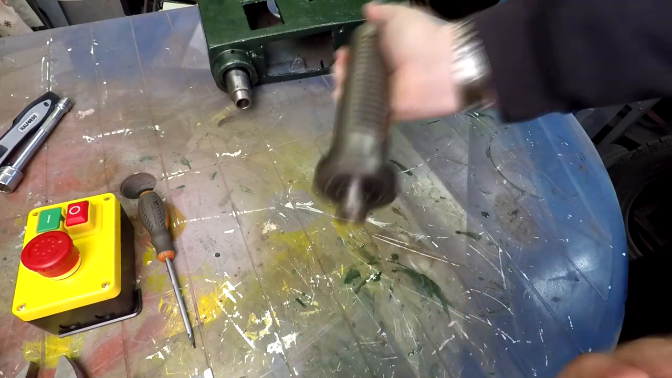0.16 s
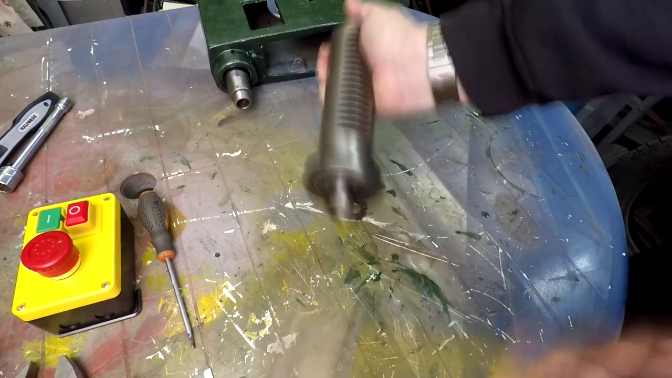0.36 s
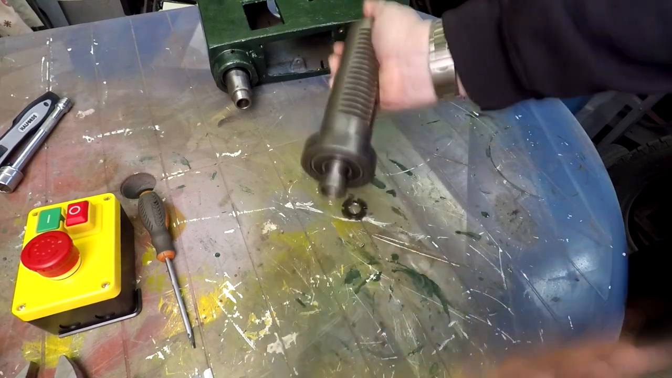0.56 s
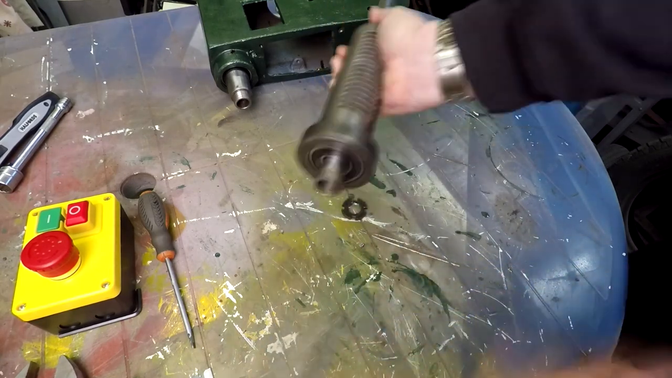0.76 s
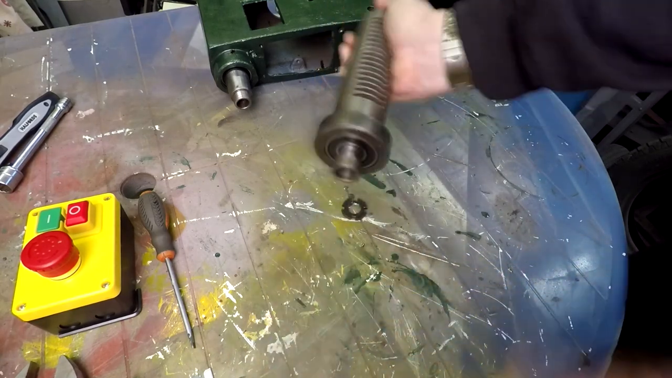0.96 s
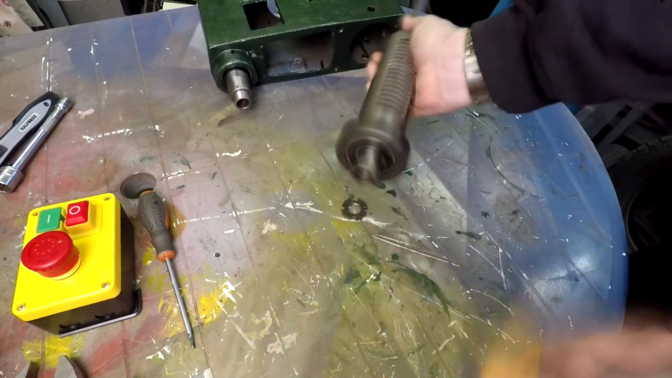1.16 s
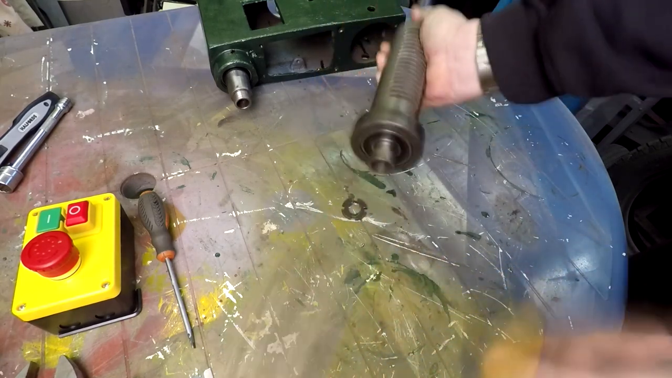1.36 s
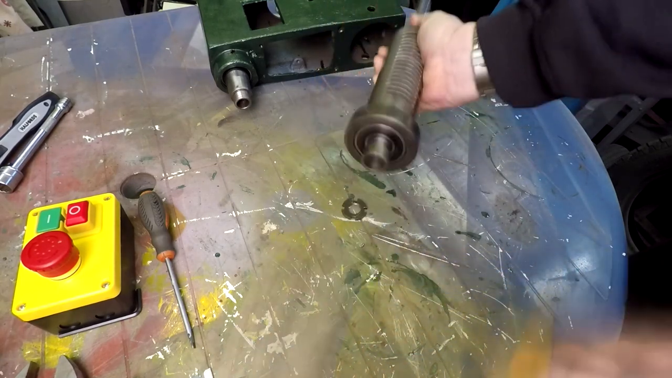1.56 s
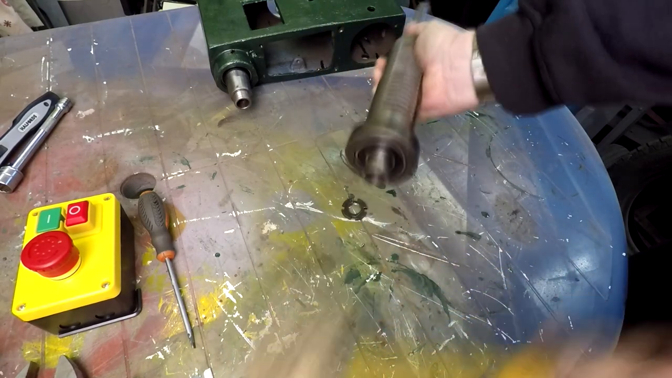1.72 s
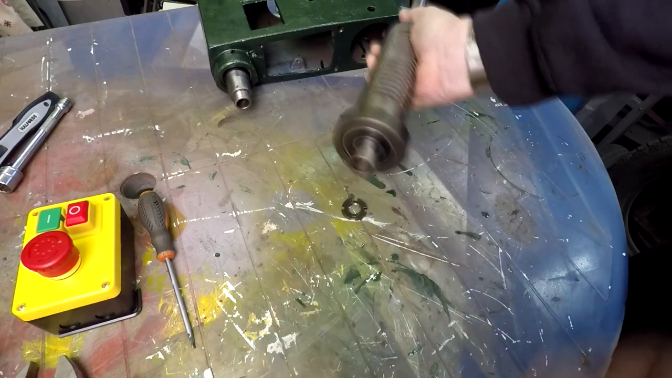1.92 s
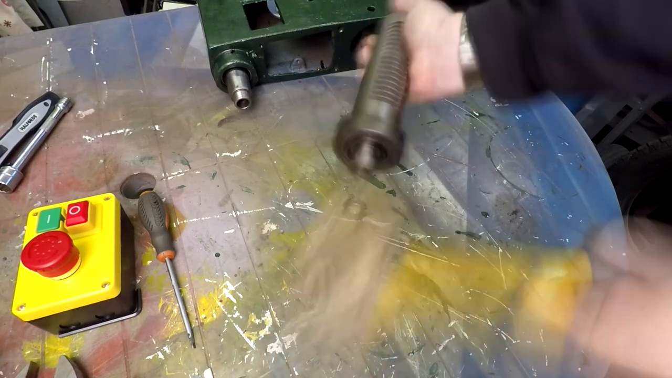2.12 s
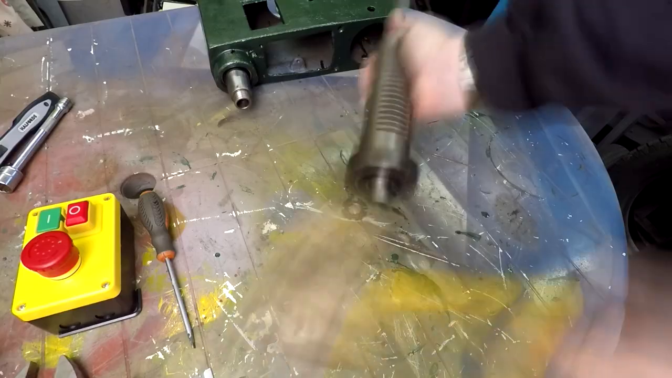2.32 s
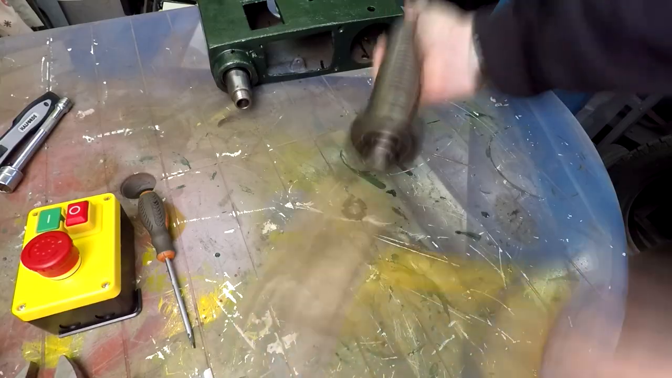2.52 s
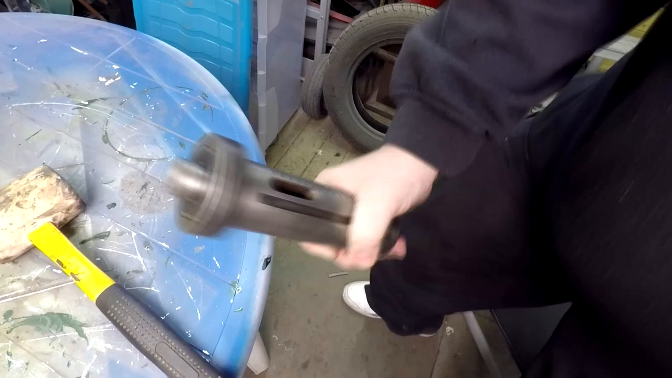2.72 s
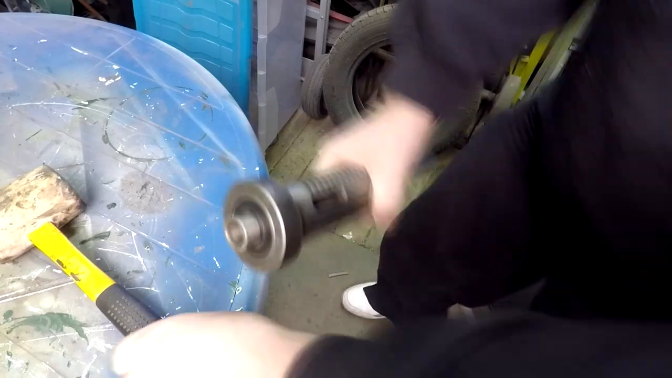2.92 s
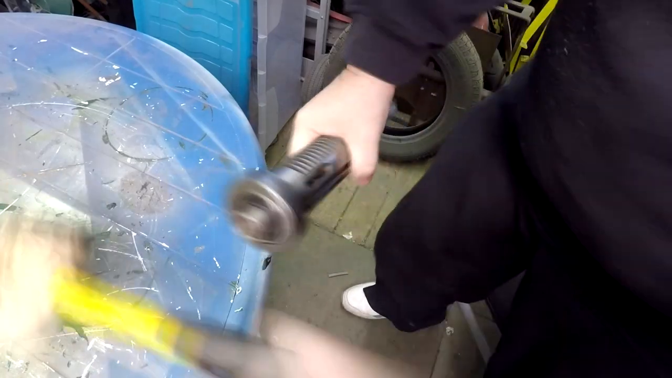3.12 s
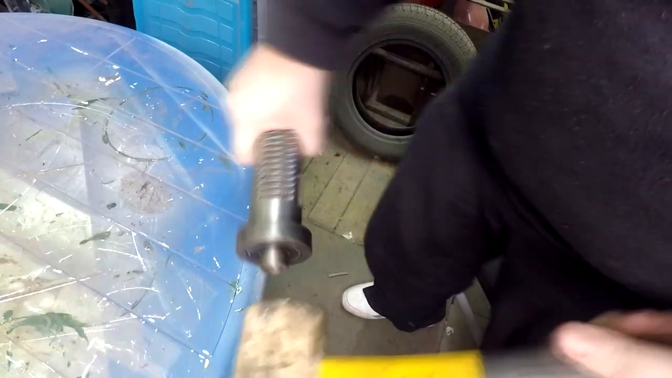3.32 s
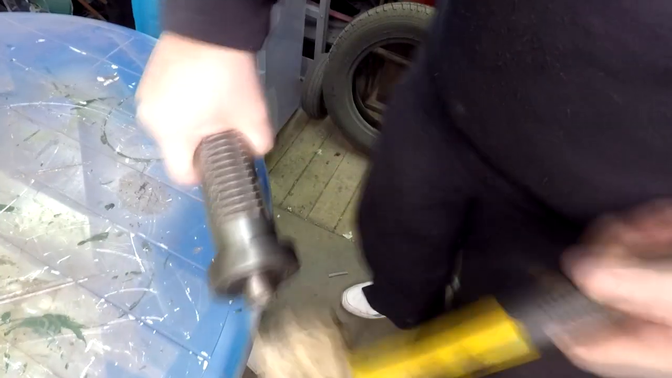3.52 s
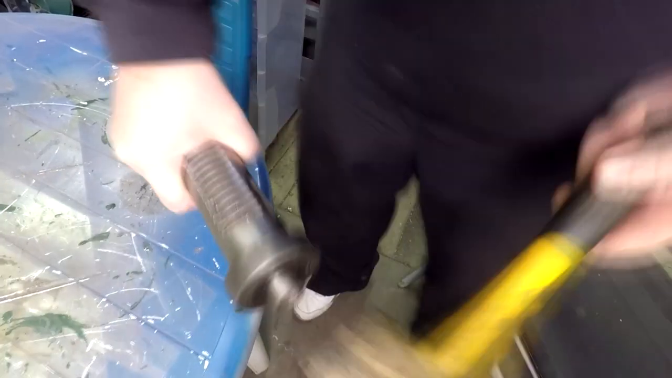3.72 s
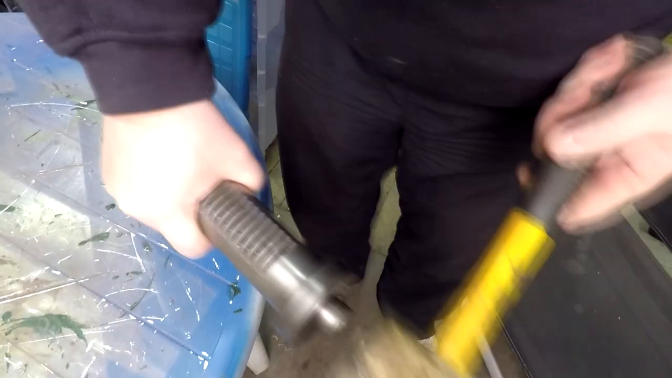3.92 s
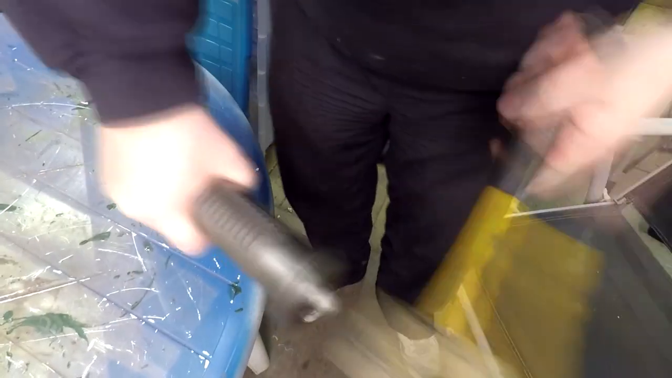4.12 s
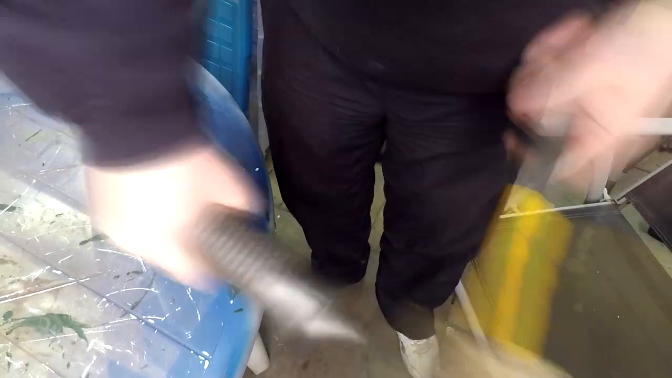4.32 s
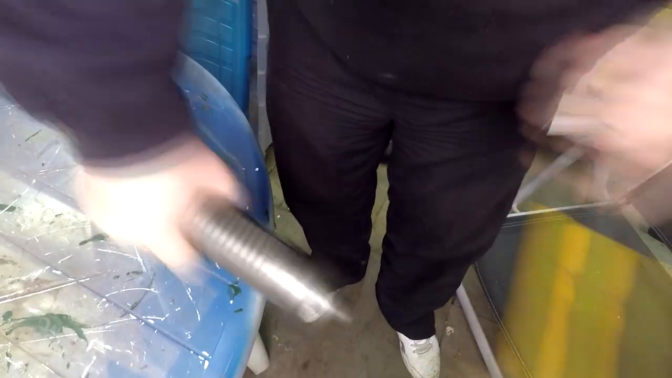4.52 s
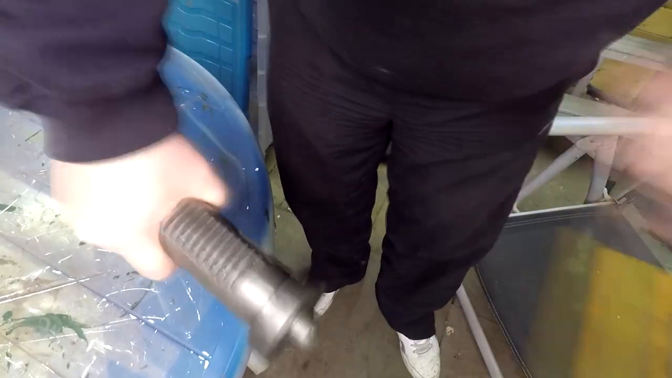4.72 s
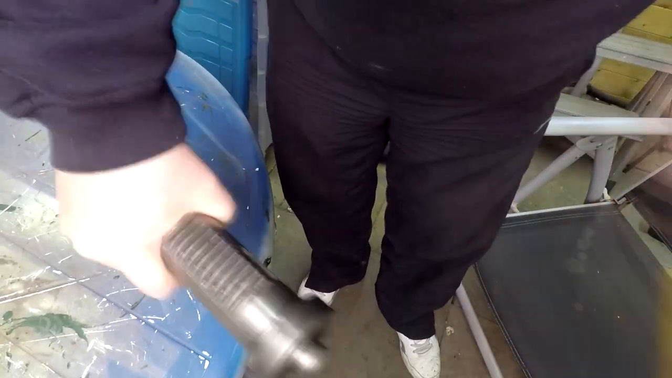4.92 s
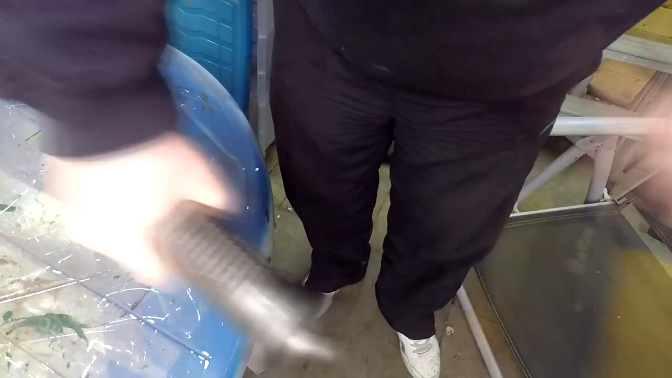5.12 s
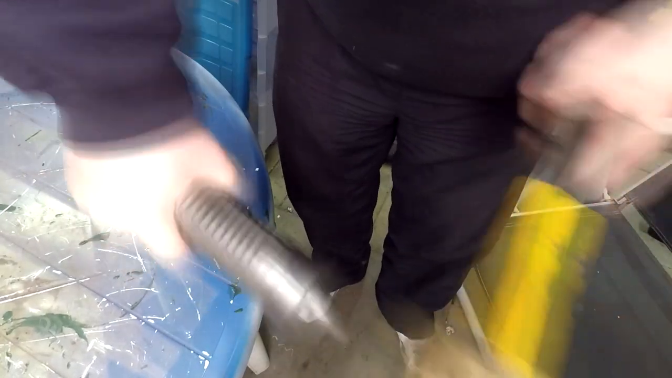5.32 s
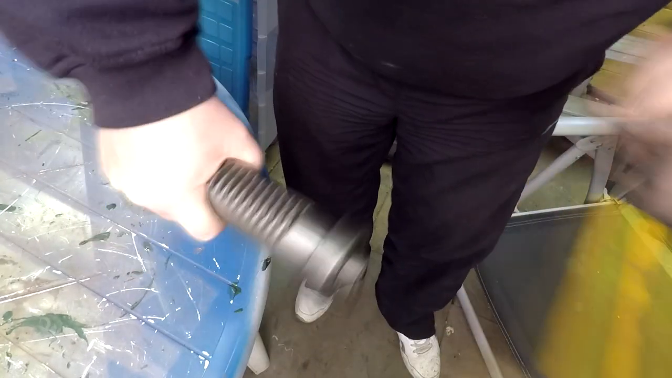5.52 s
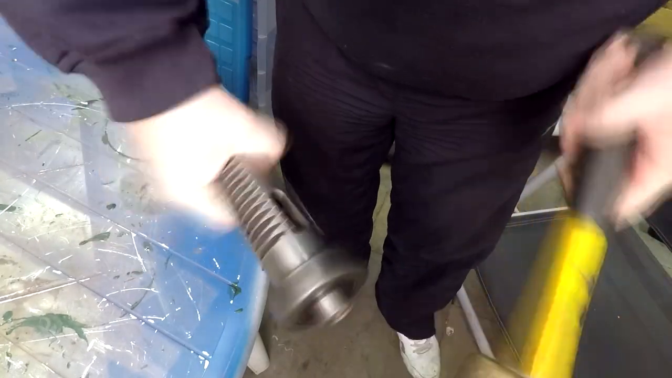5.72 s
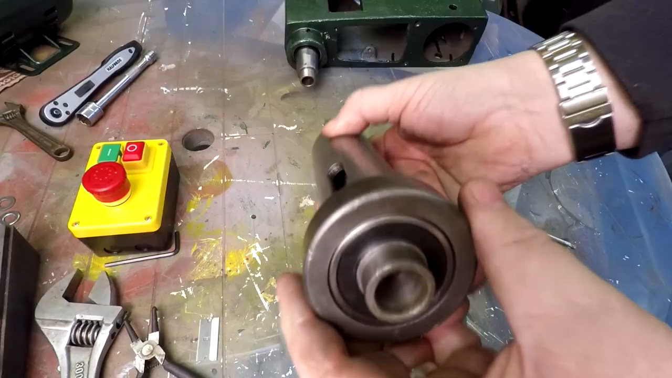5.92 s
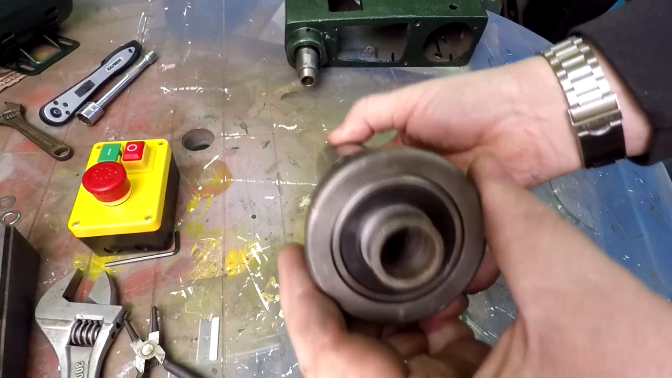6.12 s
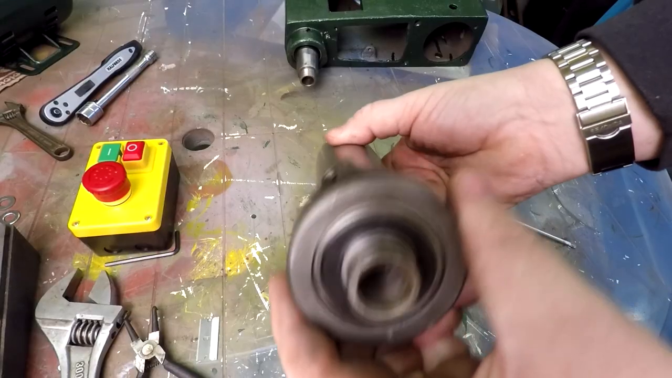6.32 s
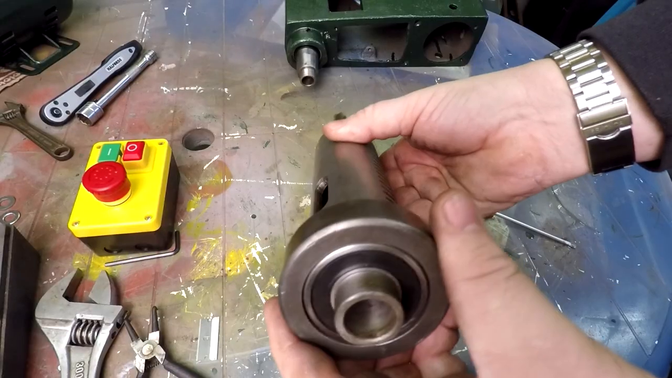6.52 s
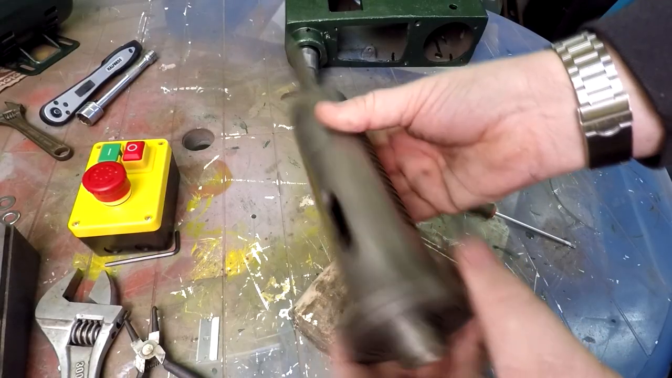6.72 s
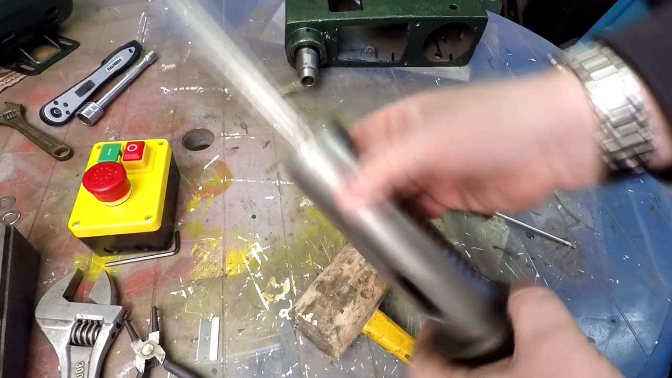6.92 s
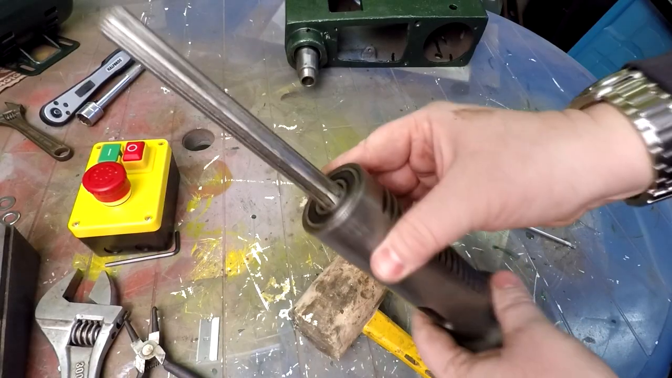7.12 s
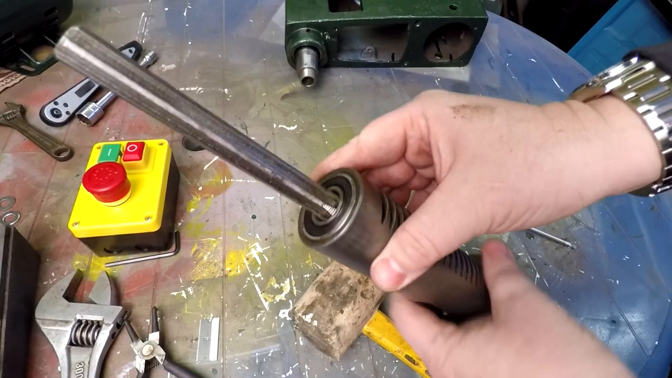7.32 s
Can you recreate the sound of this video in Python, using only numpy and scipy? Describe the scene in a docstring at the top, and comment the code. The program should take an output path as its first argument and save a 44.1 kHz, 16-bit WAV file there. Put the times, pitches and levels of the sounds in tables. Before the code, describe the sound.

Close, slightly overloaded sound of wood knocking on steel: two fast, even bursts of hard taps with damped ringing, separated by a short gap. Then cloth scuffs, deep wobbling rumble and dull bumps as the microphone is jostled. Slower, fuller side blows come next in a steady run. They stop abruptly, leaving quiet workshop air, a faint hum and a barely audible palm slide on the metal. The room is small, with short reflections.

```python
"""Quick runs of taps ring out: a wooden mallet hits a hand-held steel spindle, first on its tip, then from the side.
Each blow is a thud pulse plus short ringing tones and noise cracks, with a copy about 14 ms before and after it.
Between the runs sleeves rustle (bursts of filtered noise) and the microphone is jostled (slow rocking, dull bumps).
Behind it lie faint workshop air and hum; late on, the spindle sings faintly under a sliding palm.
The close microphone overloads a little, which rounds off the loudest peaks."""
import sys
import numpy as np
from scipy import signal
from scipy.fft import rfft, irfft
from scipy.io import wavfile

SR = 44100
rng = np.random.default_rng(int(sys.argv[2]) if len(sys.argv) > 2 else 0)


def store_wav(level_fs):
    """Save 16-bit WAV to argv[1]."""
    pcm = np.round(np.clip(np.atleast_2d(level_fs), -1, 1) * 32767)
    wavfile.write(sys.argv[1], SR, pcm.T.astype(np.int16))


N = 324576
TIME = np.arange(N) / SR  # the whole scene, in seconds
HIT = np.arange(int(0.35 * SR)) / SR  # the span of one short sound, in seconds
ATTACK = int(0.012 * SR)  # samples at the start of a hit over which its level is set
TOP_HZ = 15400  # the microphone passes nothing much above this
LATE_S = 5.915  # the hammering is over

# mallet blows: (time [s], strength against a usual blow [dB], extra ring of the spot that is hit [dB],
# early copy against the blow [dB])
BLOWS = [(0.2445, -9, 6.5, -43.5), (0.3402, -4.5, 11, -41.5), (0.438, -0.5, 6, -21),
         (0.5298, 1.5, 7.5, -12.5), (0.6217, 0, -1, -32), (0.7302, 0.5, 10.5, -17), (0.841, 3.5, 4, -11.5),
         (0.9353, 3.5, -3.5, -25.5), (1.0378, 3, 9.5, -21), (1.1283, -5, 12, -43), (1.237, 3, 4, -29),
         (1.3398, 2.5, 3, -12), (1.4406, 1.5, 8, -12), (1.531, -1.5, 11.5, -36), (1.6389, 1, 0, -7.5),
         (2.0194, -0.5, -5.5, -42.5), (2.1401, 2, -3, -31), (2.244, 0.5, 9, -11), (2.3325, 3, 5.5, -24),
         (2.428, 1, 6.5, -18.5), (2.5194, -0.5, 9.5, -39.5), (2.6193, .5, 8, -14.5), (4.1536, -5, -2, -5),
         (4.3385, 3.5, -5.5, -24.5), (4.5206, -1.5, 0, -2.5), (4.6927, 2, -4, -15.5), (4.8596, 2, -3, -19),
         (5.0162, 1, -2, -29.5), (5.1715, 1.5, -4.5, -25), (5.332, -1.5, 3.5, -9), (5.4834, -1, 7.5, -15),
         (5.6431, -0.5, 2, -32.5)]
# the two ways of striking: (start [s], time between the copies of a blow [s], room sound against the blow [dB])
TIP = (0, .0146, -24)
SIDE_ON = (3.5, .0131, -22.5)


def undb(db):
    """Turn decibels into a gain."""
    return 10 ** (np.asarray(db) / 20)


def unit(x, count=None):
    """Scale so that the first count samples (or all) have an rms of 1."""
    return x / np.sqrt(np.mean(x[:count] ** 2) + 1e-18)


def add(out, s, x):
    """Mix x into out, starting at time s in seconds."""
    start = max(int(s * SR), 0)
    out[start:start + len(x)] += x[:len(out) - start]


def noise(points, size, lo=0, hi=SR):
    """Noise of rms 1 coloured by (frequency [Hz], level [dB]) points, kept between lo and hi."""
    f = np.fft.rfftfreq(size, 1 / SR)
    hz, db = np.transpose(points)
    gain = undb(np.interp(np.log(f + 1e-9), np.log(hz), db))
    gain = gain * (f > lo) * (f < hi)
    white = rng.standard_normal(size)
    return unit(irfft(rfft(white) * gain, size))


def butter(x, hz, kind, order=2):
    """Butterworth filter that looks only at past sound."""
    return signal.sosfilt(signal.butter(order, hz, kind, fs=SR, output="sos"), x)


def fade(t60):
    """Exponential fade that drops 60 dB in t60 seconds."""
    return np.exp(-np.log(1000) * HIT / t60)


def walk(rate, size=N):
    """Random wander of rms 1, drawn as straight lines between rate random points per second."""
    steps = np.arange(size) * rate / SR
    count = int(steps[-1]) + 2
    return unit(np.interp(steps, np.arange(count), rng.standard_normal(count)))


def scatter(start, end, count):
    """Loosely spread moments between start and end, each with a random deviation of spread 1."""
    times = start + (end - start) * (np.arange(count) + rng.random(count)) / count
    return zip(times, rng.standard_normal(count))


def background(air_db=-55, late_air_db=-48.5, hum_rise_db=7.5):
    """Steady workshop air and a wavering machine hum, both a little fuller once the hammering is over."""
    # colour of the air while hammering and afterwards: (frequency [Hz], level [dB])
    early_colour = [(15, -45), (25, -1.5), (167, -35), (207, -11), (237, -28.5), (543, -22.5), (621, -16),
                    (729, -23.5), (856, -25), (978, -35), (1240, -26), (1350, -31.5), (2560, -40),
                    (15000, -63)]
    late_colour = [(24, 6), (40, 1), (80, -4), (115, -7.5), (165, -15.5), (205, -9.5), (466, -19.5),
                   (612, -5), (728, -16.5), (784, -10.5), (1030, -25.5), (1260, -16.5), (1480, -17),
                   (1750, -33.5), (2520, -29.5), (11100, -51), (15000, -55)]
    # machine hum: (frequency [Hz], width of its wander [Hz], level midway between early and late [dB])
    hum_tones = [(617.6, 7, -56), (702, 37, -68.5), (1240, 25, -69.5)]
    late = np.clip((TIME - LATE_S) / 0.008, 0, 1)
    early_air = (1 - late) * undb(air_db) * noise(early_colour, N)
    late_air = late * undb(late_air_db) * noise(late_colour, N)
    hum = np.zeros(N)
    for hz, width_hz, db in hum_tones:
        wandering_hz = hz + width_hz / 2 * walk(60)
        tone = np.sin(2 * np.pi * np.cumsum(wandering_hz) / SR)
        hum += undb(db) * unit(tone * undb(2 * walk(25)))
    return early_air + late_air + hum * undb(hum_rise_db * (late - 0.5))


def light_scuffs(per_s=34, length_s=0.032, scatter_db=3):
    """Small scuffs at random moments for as long as the hands are busy."""
    # spells of handling: (start [s], end [s], average level [dB], brightness [Hz])
    handling = [(2.696, 3.45, -64.5, 6000), (3.496, 4.0, -56, 6000), (4.299, 4.9, -61, 4005),
                (6.649, 7.36, -69, 14000)]
    scuffs = []
    for start, end, db, top_hz in handling:
        count = max(int((end - start) * per_s), 1)
        for s, chance in scatter(start, end, count):
            scuffs.append((s, db + scatter_db * chance, length_s, top_hz))
    return scuffs


def cloth(grain_db=1.5, grain_rate=500, catch_db=1.5, catch_rate=90):
    """Sleeves and palms slide in tiny catches, heard as uneven noise; each scuff has its own brightness."""
    # brisk scuffs of hand and cloth: (time [s], level [dB], length [s], brightness [Hz])
    # the pressure peaks halfway through the length and then trails off
    brisk_scuffs = [(0.0, -58.5, .032, 6100), (2.76, -46, 0.034, 4000), (2.999, -39.5, 0.026, 6640),
                    (3.064, -40, 0.021, 2420), (3.151, -49, 0.033, 3600), (3.249, -53.5, 0.017, 7100),
                    (3.438, -47.5, 0.037, 3720), (3.496, -38, 0.02, 7000), (3.647, -37.5, 0.05, 3720),
                    (3.757, -44, 0.072, 9300), (3.833, -40.5, .017, 6900), (3.921, -38.5, 0.013, 8800),
                    (7.087, -59, .025, 7000)]
    # colour of rubbing sleeves and palms: (frequency [Hz], level [dB])
    rustle_colour = [(250, -3.5), (700, -4), (1500, -1), (3500, -3), (5500, -10), (9000, -13), (15000, -13)]
    out = np.zeros(N)
    for s, db, length_s, top_hz in brisk_scuffs + light_scuffs():
        age = 2 * HIT / length_s
        pressure = age * np.exp(1 - age)
        grain = undb(grain_db * walk(grain_rate, len(HIT)) + catch_db * walk(catch_rate, len(HIT)))
        rubbing = noise(rustle_colour, len(HIT)) * grain
        slide = unit(butter(rubbing, min(top_hz, TOP_HZ), "low"))
        add(out, s, undb(db) * pressure * slide)
    return out


def jostle(rock_db=2.0, rock_hz=26, rumble_db=-13, sway_db=-49, uneven_db=2, rub_db=-10, rub_t60=0.15):
    """The microphone rocks on its mount with every blow and lurch, rumbles and takes a few dull bumps."""
    # lurches that swell and die away:
    # (time of the peak [s], level before rock_db or rumble_db [dB], half-length [s])
    lurch_table = [(2.815, -29.5, 0.036), (3.057, -42, 0.11), (3.476, -17, 0.032), (3.562, -16.5, 0.037),
                   (3.783, -21, 0.055), (3.884, -13.5, 0.022)]
    # shake by each blow, before rock_db or rumble_db: (on the tip [dB], from the side [dB])
    shake_db = (-49, -37.5)
    shake_peak_s = 0.043  # the shake is strongest this long after the blow
    # colour of the rumble: (frequency [Hz], level [dB])
    sway_colour = [(15, -6), (35, 4.5), (70, -4), (150, -16.5), (300, -24), (700, -42), (3000, -95)]
    # dull bumps: (time [s], level [dB])
    bumps = [(3.055, -38.5), (3.075, -18.5), (3.505, -32), (3.646, -29.5), (3.858, -33.5), (3.927, -32),
             (4.0, -36.5), (4.825, -34.5)]
    # tones within a bump: (frequency [Hz], time to fade by 60 dB [s], level within the bump [dB])
    bump_modes = [(75.4, 0.17, -8.5), (150, 0.094, -1), (225, 0.034, -1.5), (404, 0.075, -18.5)]
    # nudges at random while the grip is changed: (start [s], end [s])
    regrip_s = (2.8, 4.0)
    nudge_db, nudge_scatter_db = -47.5, 0.5

    shakes = np.zeros(N)
    for s, *_ in BLOWS:
        age = HIT / shake_peak_s
        add(shakes, s, undb(shake_db[int(s > SIDE_ON[0])]) * age * np.exp(1 - age))
    lurches = sum(undb(db) * np.exp(-((TIME - s) / half_s) ** 2) for s, db, half_s in lurch_table)
    # a steady sway that fades out as the hammering ends
    steady = undb(sway_db) * np.clip((LATE_S - TIME) / 0.19, 0, 1)
    sway = lurches + (shakes + steady) * undb(uneven_db * walk(36))

    wandering_hz = rock_hz * np.exp(0.25 * walk(25))
    rock = unit(np.sin(2 * np.pi * np.cumsum(wandering_hz) / SR))
    out = sway * (undb(rock_db) * rock + undb(rumble_db) * noise(sway_colour, N))

    nudges = [(s, nudge_db + nudge_scatter_db * chance) for s, chance in scatter(*regrip_s, count=10)]
    for s, db in bumps + nudges:
        body = np.zeros(len(HIT))
        for hz, t60, mode_db in bump_modes:
            body += undb(mode_db) * np.sin(2 * np.pi * hz * HIT) * fade(t60)
        low_noise = unit(butter(rng.standard_normal(len(HIT)), [80, 280], "band"))
        rub = undb(rub_db) * low_noise * fade(rub_t60)
        soft_start = 1 - np.exp(-HIT / 0.0023)
        add(out, s, undb(db) * unit((body + rub) * soft_start, ATTACK))
    return out


def thud(delay_s=0.001, push_s=0.004134, leak_hz=62, sag_hz=21, spread=0.11):
    """The mallet head stops within milliseconds: one suction pulse that swings back slowly."""
    length_s = push_s * np.exp(spread * rng.standard_normal())
    push = -np.sin(np.pi * np.clip((HIT - delay_s) / length_s, 0, 1))
    leaked = butter(push, leak_hz, "high", order=1)
    return unit(butter(leaked, sag_hz, "high", order=3), ATTACK)


def ringing(levels_db, side, scatter_db=1.0, detune=0.012):
    """Damped tones (modes) and a short noisy crack, levelled separately in each pitch range (register)."""
    # edges of the registers knock, ring, clack and ping [Hz]
    register_hz = [250, 1000, 1900, 3300, 16000]
    # spindle and mallet head, damped by the hand: (frequency [Hz], time to fade by 60 dB [s],
    # level within its register struck on the tip [dB], the same struck from the side [dB])
    steel_modes = [(556, 0.044, -18, 0.5), (690.4, 0.049, -20, 1), (826.5, 0.045, -0.5, -27.5),
                   (1207.5, 0.024, -9.5, -10.5), (1409.5, .035, -5, 1.5), (1494, 0.034, -2, -1.5),
                   (1588, 0.063, -17.5, -9.5), (2314, 0.036, 3, -4), (2587, 0.037, -2, -11),
                   (2900, 0.0072, 6.5, -1.5), (3100, .016, 1.5, -8.5), (3700, .028, 1.5, -11),
                   (3950, .022, -2.5, -9), (4595, .038, -16.5, 1.5), (4810, .025, -9, -10),
                   (7540, .035, -17.5, -12), (7900, 0.033, -27, -10), (8640, 0.039, -19.5, -15),
                   (11850, 0.06, -41, -17), (11960, .04, -21, -36.5)]
    # crack of wood on steel: (frequency [Hz], level on the tip [dB], level from the side [dB])
    crack_table = [(290, 9.5, 13), (486, -3, 3), (896.3, -10.5, -13), (1455, 19, -5), (1910, -0.5, -9),
                   (2700, 6, -1.5), (4027, 0, 2.5), (5330, -8.5, -5.5), (9100, -16, -6),
                   (11300, -22.5, -15.5), (15900, -28.5, -24)]
    # per register: (trim [dB], crack against modes [dB], crack fade by 60 dB [s], build-up [s])
    # the build-up softens the start of modes and crack alike
    voices = [(0, (0, -1)[side], 0.033, 0.0002), (1, -6.5, 0.05, 0.00078),
              (1, -1, 0.04, 0.00051), (1, 1.5, 0.035, 0.00016)]

    hz, t60, *mode_db = np.transpose(steel_modes)
    chance = rng.standard_normal((len(hz), 3))
    detuned_hz = hz * (1 + detune * chance[:, 0])
    phase = 2 * np.pi * (np.outer(detuned_hz, HIT) + chance[:, 1:2])
    gain = undb(mode_db[side] + scatter_db * chance[:, 2])
    modes = gain[:, None] * np.sin(phase) * fade(t60[:, None])
    crack_colour = np.array(crack_table)[:, [0, 1 + side]]

    out = np.zeros(len(HIT))
    for lo, hi, db, voice in zip(register_hz, register_hz[1:], levels_db, voices):
        trim_db, crack_db, crack_t60, rise_s = voice
        tone = unit(modes[(hz >= lo) & (hz < hi)].sum(0), ATTACK)
        crack = unit(noise(crack_colour, len(HIT), lo, hi) * fade(crack_t60), ATTACK)
        build_up = 1 - np.exp(-HIT / rise_s)
        register = unit((tone + undb(crack_db) * crack) * build_up, ATTACK)
        out += undb(db + trim_db) * register
    return out


def workshop(x, build_s=0.014):
    """Diffuse reflections of a small cluttered room, as fading noise bands; the highest die away first."""
    # workshop reverberation: (frequency [Hz], time to fade by 60 dB [s], relative level [dB])
    room = [(300, 0.13, -2.5), (1500, 0.12, -5), (3500, 0.12, 1), (7000, 0.1, -2.5), (15000, 0.031, -2.5)]
    hz, t60, db = np.transpose(room)
    edges = np.geomspace(150, 16000, 10)
    tail = np.zeros(len(HIT))
    for lo, hi in zip(edges, edges[1:]):
        centre = np.sqrt(lo * hi)
        band = butter(rng.standard_normal(len(HIT)), [lo, hi], "band", order=3)
        tail += undb(np.interp(centre, hz, db)) * band * fade(np.interp(centre, hz, t60))
    tail = tail * (1 - np.exp(-HIT / build_s))
    return signal.fftconvolve(x, tail / np.linalg.norm(tail))[:len(x)]


def mallet(fade_in_s=0.013, fade_in_gain=4.1, copies_sum_db=-43):
    """Each blow sounds three times: an early copy, the blow itself and a late copy."""
    # a usual blow, one row each for thud, knock, ring, clack and ping, before aim, spot and trim:
    # (level on the tip [dB], level from the side [dB], gain per dB of strength [dB])
    voicing = [(-19.4, -17, 0.59), (-29.5, -20.5, 1.23), (-26, -21, 1.0), (-28, -22, 1.18),
               (-28.5, -22, .9)]
    # the point of contact wanders during each run and shifts the colour:
    # (time [s], knock raised [dB], ping raised and clack lowered [dB])
    aim = [(0.24, 6.5, -2.5), (0.85, -3, 2), (1.45, 4, 1), (1.7, -0.5, -3), (2.62, 1.5, -2),
           (4.15, -10.5, 1), (4.5, 3.5, -.5), (4.95, -2.5, -2.5), (5.2, -3.5, 1.5), (5.65, -4, 2)]
    *usual_db, growth = np.transpose(voicing)
    aim_s, aim_knock_db, aim_bright_db = np.transpose(aim)
    out = np.zeros(N)
    for s, strength_db, spot_db, early_db in BLOWS:
        side = int(s > SIDE_ON[0])  # 0 on the tip, 1 from the side
        _, spacing_s, room_db = (TIP, SIDE_ON)[side]
        thud_db, knock_db, ring_db, clack_db, ping_db = usual_db[side] + growth * strength_db
        body_db = np.interp(s, aim_s, aim_knock_db)
        bright_db = np.interp(s, aim_s, aim_bright_db)
        levels_db = [knock_db + body_db, ring_db + spot_db, clack_db - bright_db, ping_db + bright_db]
        blow = undb(thud_db) * thud() + ringing(levels_db, side)
        blow = blow + undb(room_db) * workshop(blow)
        # a weak early copy fades in towards the blow
        start_gain = min(undb(early_db / 2), 1)
        fade_in = start_gain + (1 - start_gain) * fade_in_gain * np.minimum(HIT / fade_in_s, 1)
        add(out, s - spacing_s, undb(early_db) * fade_in * blow)
        add(out, s, blow)
        # the levels of the early and late copies, in dB, add up to a constant
        late_copy_db = copies_sum_db - early_db
        add(out, s + spacing_s, undb(late_copy_db) * blow)
    return out


def sing(width_hz=45):
    """Skin rubbing on the steel keeps one of its modes sounding, made here from a narrow band of noise."""
    # a palm slides along the spindle: (time of the peak [s], half-length [s], frequency [Hz], level [dB])
    palm_slide = (7.08, .12, 3080, -68)
    s, half_s, hz, db = palm_slide
    mode = unit(butter(rng.standard_normal(N), [hz - width_hz, hz + width_hz], "band"))
    return undb(db) * np.exp(-((TIME - s) / half_s) ** 2) * mode


def scene():
    """Add up everything that reaches the one microphone."""
    return (background() + cloth() + jostle() + mallet() + sing())[None]


def record(dry):
    """The microphone flattens the loudest peaks, and the top of the treble is cut."""
    rounded = dry / (1 + (dry / 0.75) ** 4) ** (1 / 4)
    return signal.sosfilt(signal.ellip(8, 0.2, 70, TOP_HZ, fs=SR, output="sos"), rounded)


dry = scene()
out = record(dry)
store_wav(out)
```